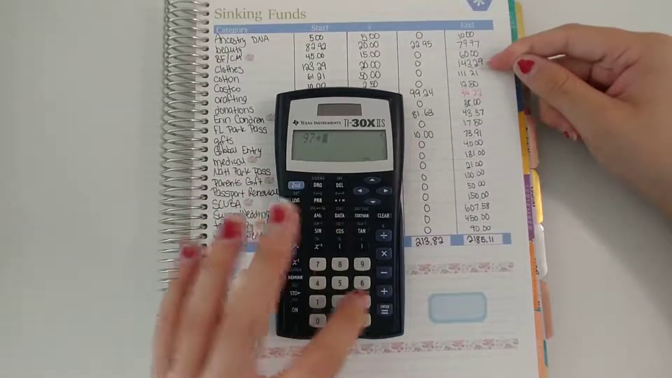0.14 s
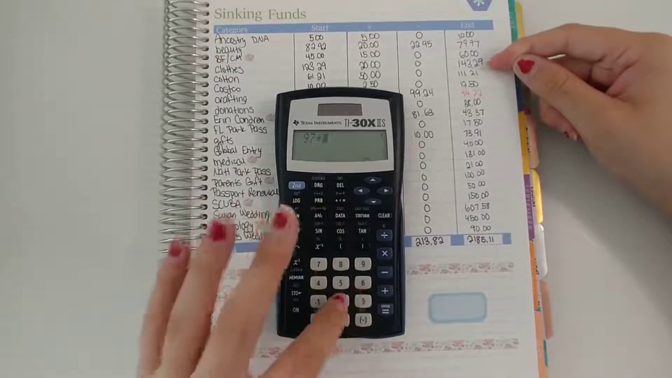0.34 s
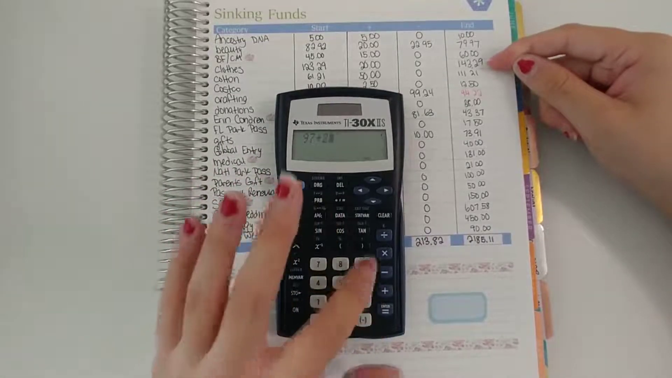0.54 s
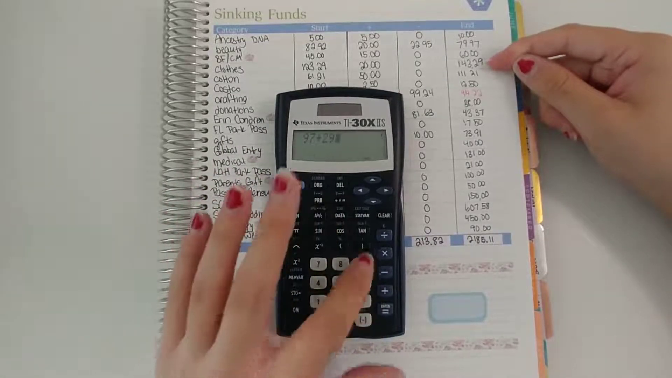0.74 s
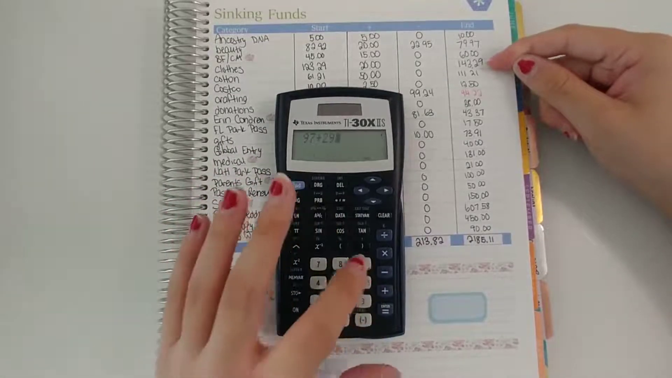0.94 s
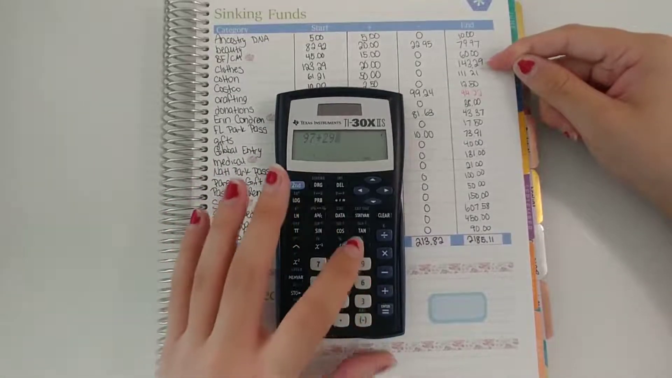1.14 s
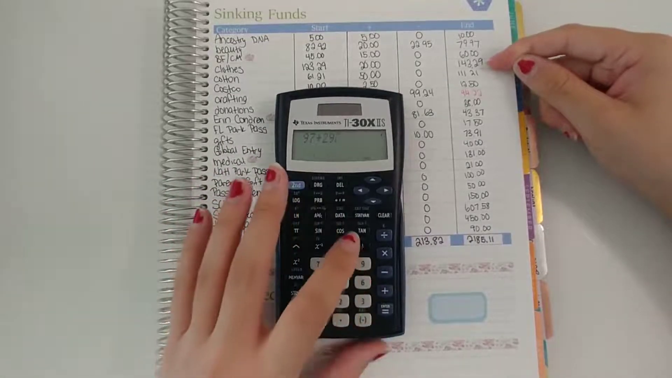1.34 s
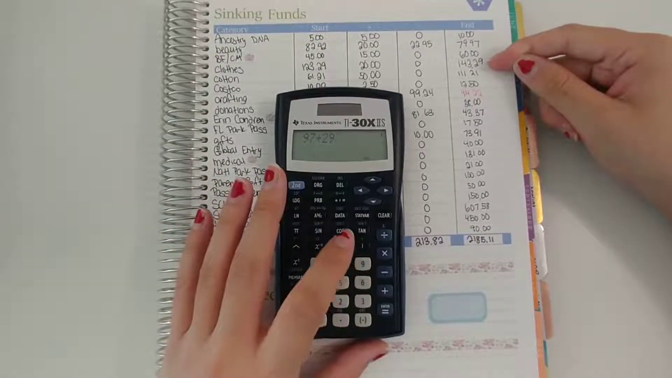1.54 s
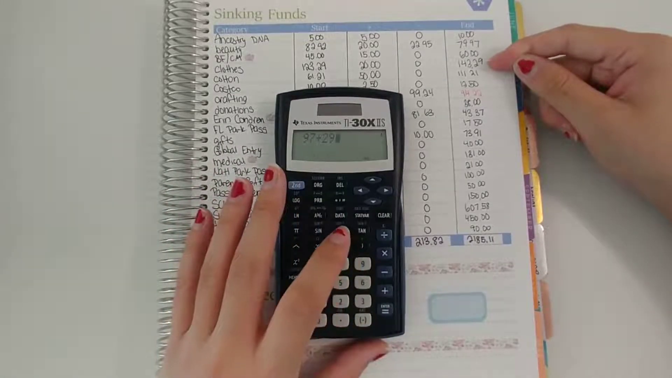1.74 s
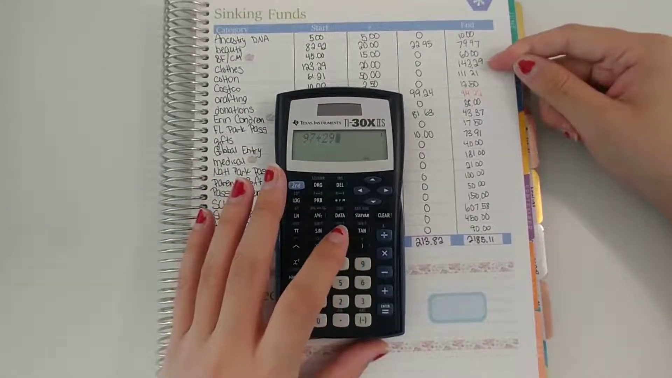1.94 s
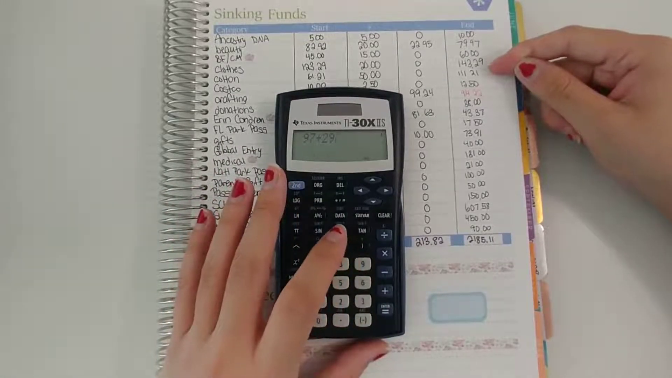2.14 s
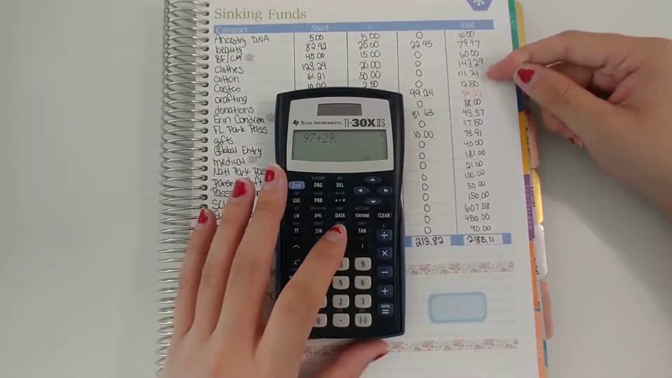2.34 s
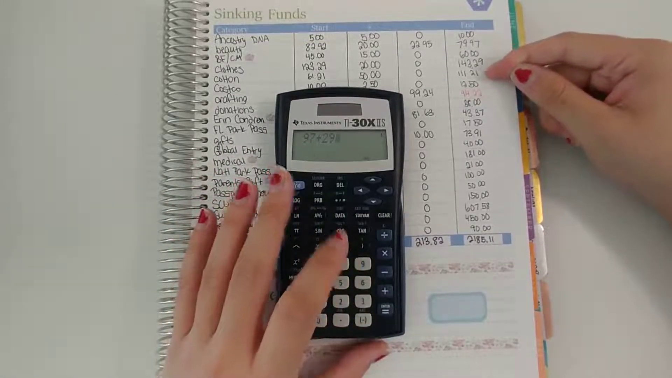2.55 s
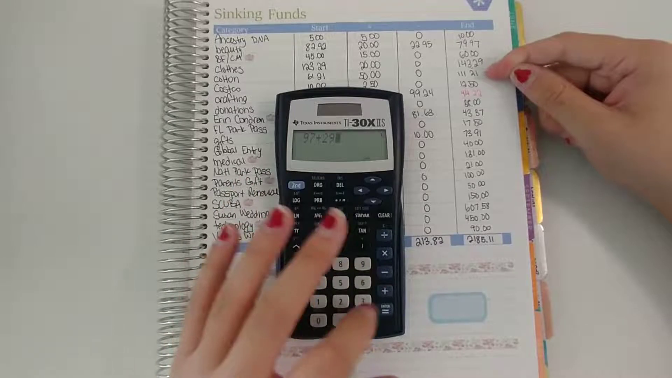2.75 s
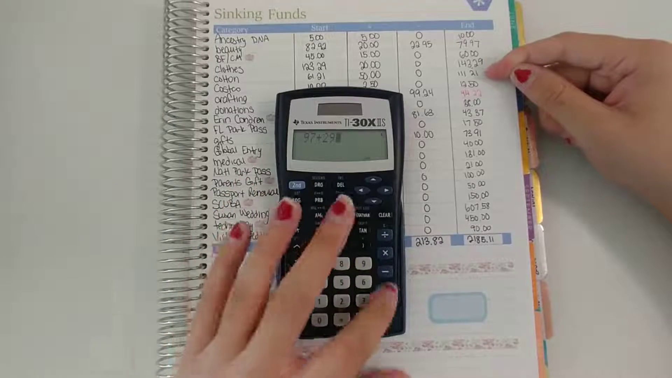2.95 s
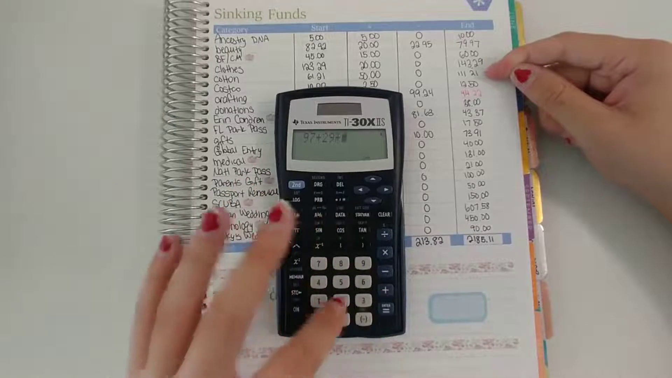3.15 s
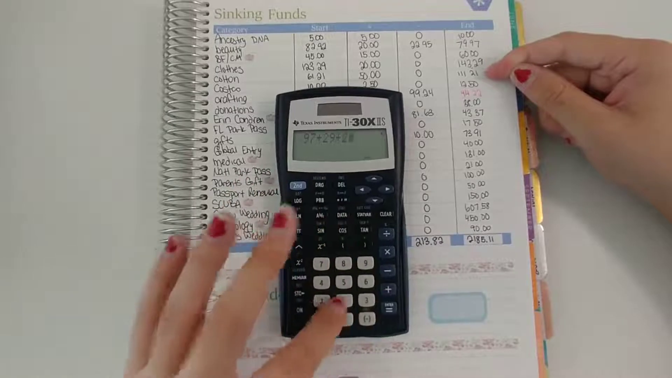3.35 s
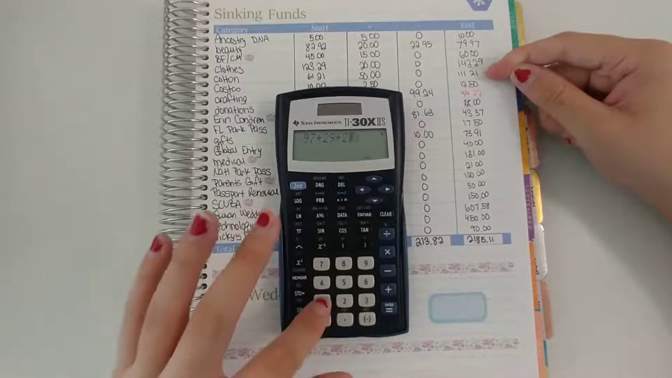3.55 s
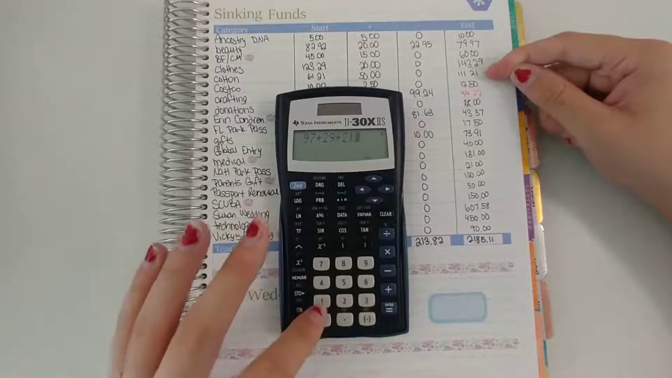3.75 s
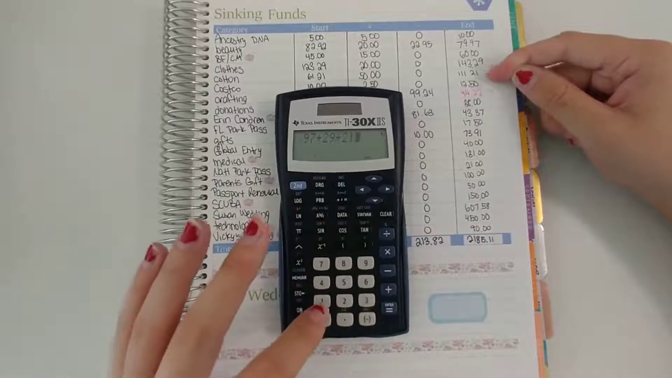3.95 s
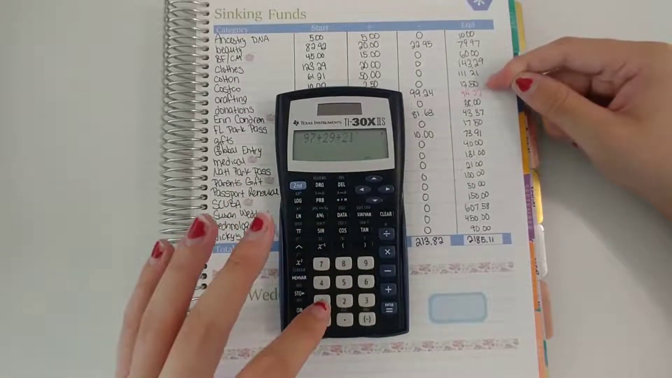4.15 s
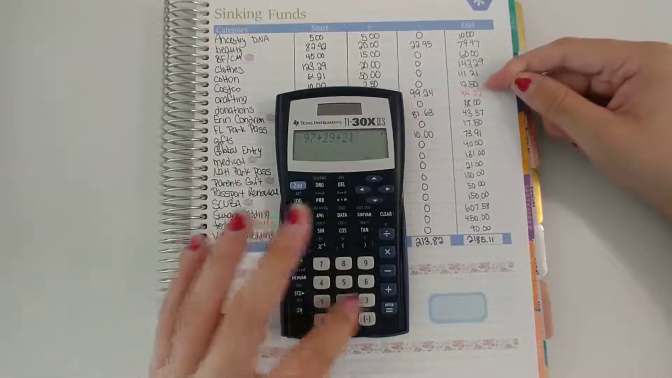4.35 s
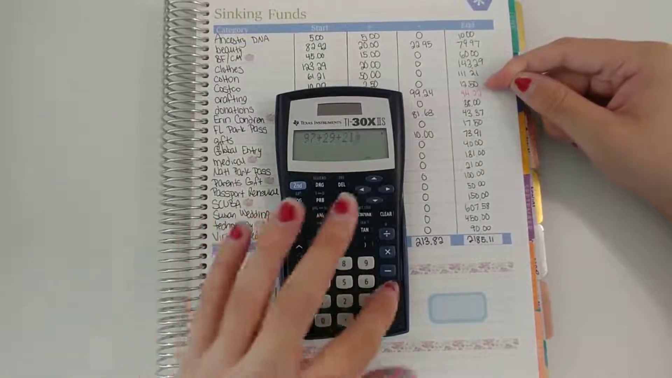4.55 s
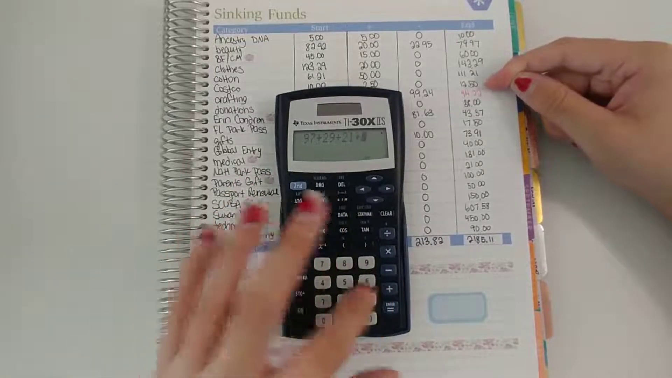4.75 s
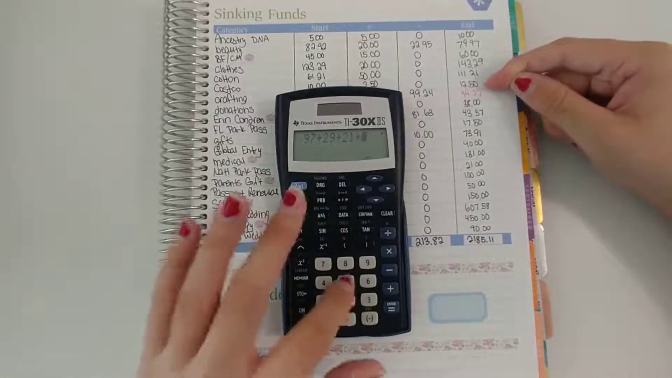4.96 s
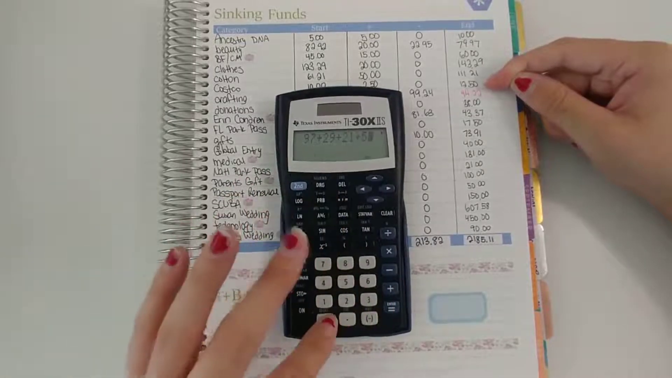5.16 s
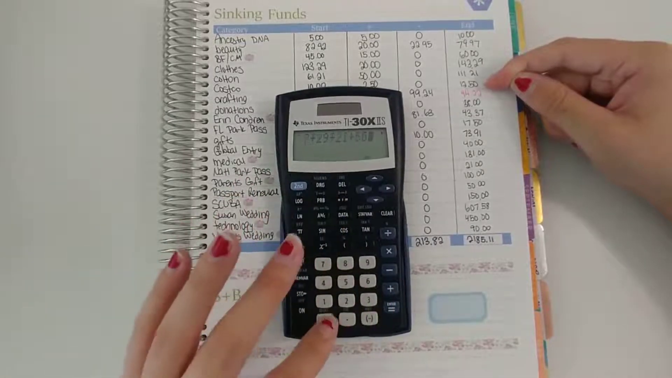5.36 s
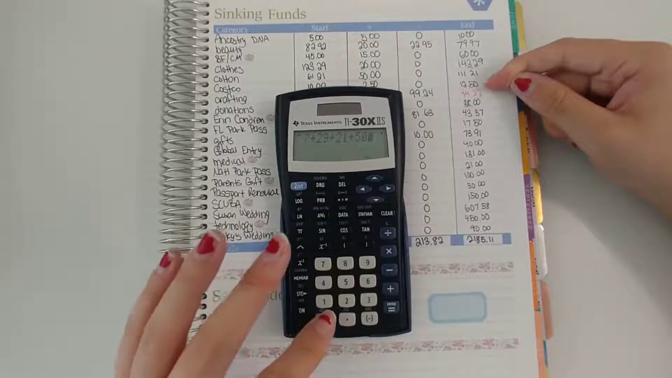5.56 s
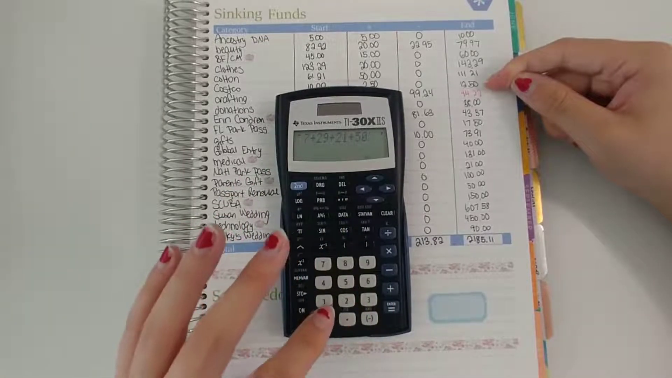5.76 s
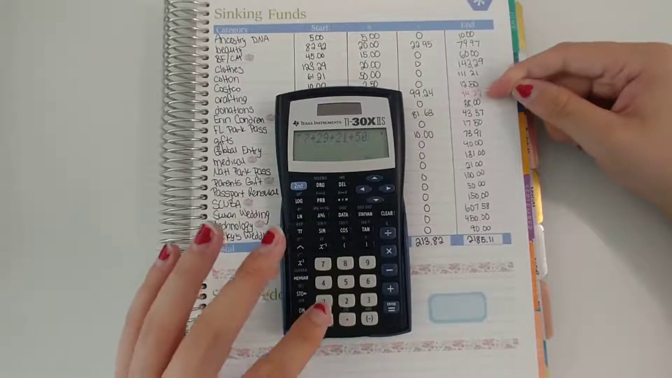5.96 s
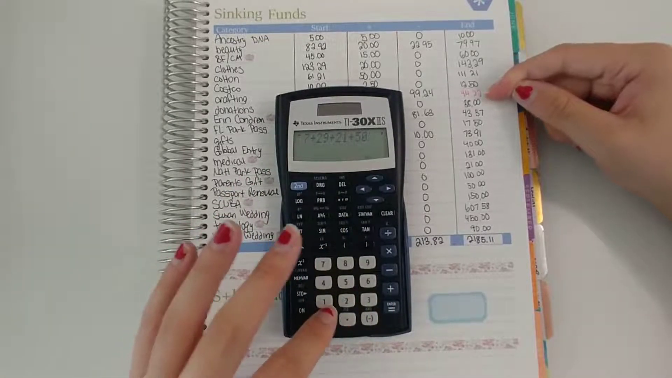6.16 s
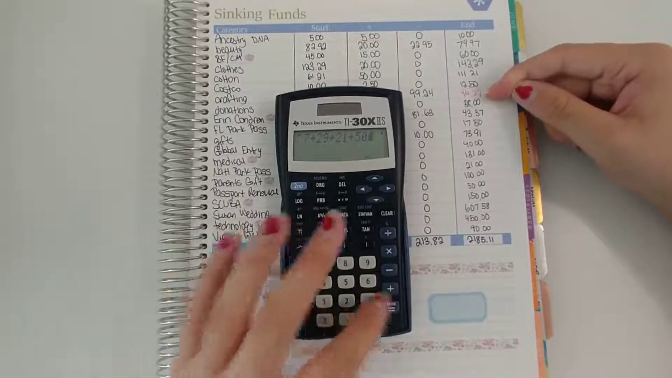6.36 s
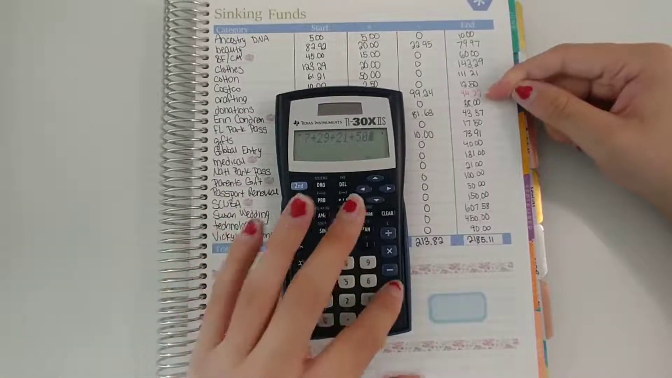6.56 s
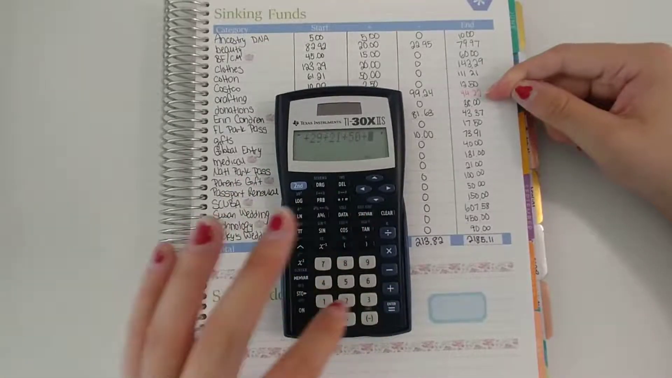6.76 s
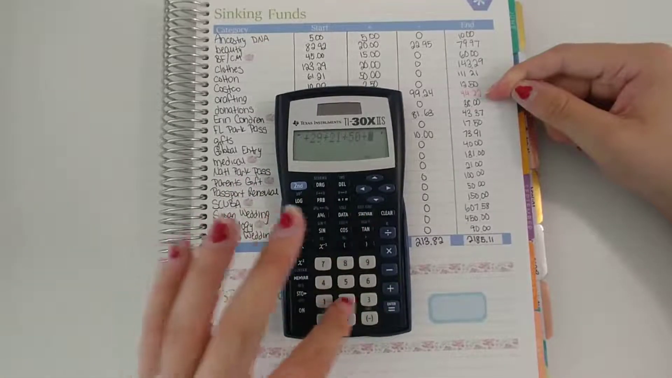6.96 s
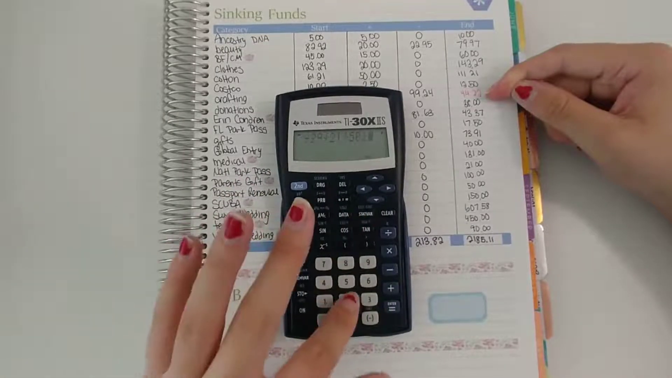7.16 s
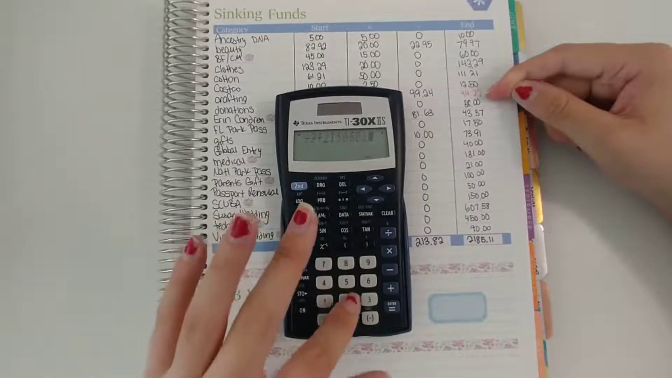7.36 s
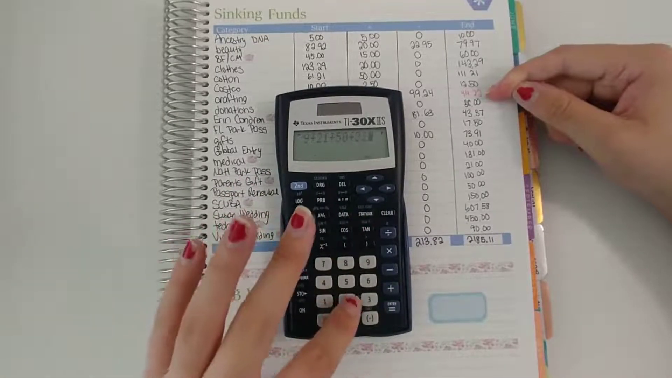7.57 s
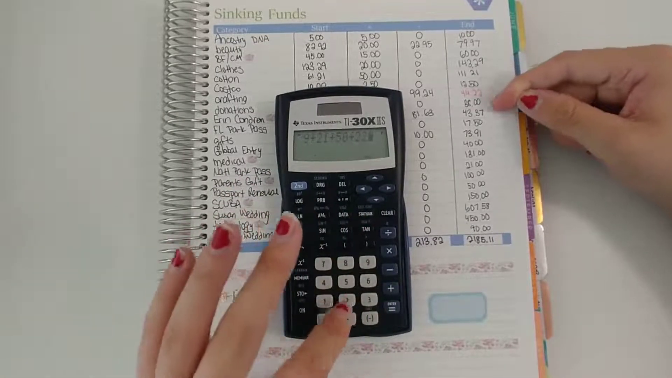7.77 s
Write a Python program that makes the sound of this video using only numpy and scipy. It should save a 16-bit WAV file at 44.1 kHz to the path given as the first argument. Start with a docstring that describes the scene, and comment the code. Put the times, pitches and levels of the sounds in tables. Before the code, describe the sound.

A thumb presses calculator keys on a desk, clicking and softly thumping, briefly interrupted by something hard knocking and clattering.

```python
"""Calculator keys on a desk

A thumb works the plastic keys of a calculator lying on a notebook: each key clicks down, thumps the
desk and snaps back. The hand brushes and pats the paper and case. Further off, something hard knocks
down, rings briefly and clatters. A small quiet room answers each blow, over a low rumble and hiss."""
import sys
import numpy as np
from scipy import signal
from scipy.fft import rfft, irfft, next_fast_len
from scipy.io import wavfile

SR = 44100
rng = np.random.default_rng(int(sys.argv[2]) if len(sys.argv) > 2 else 0)


def master(y):
    """Save y as 16-bit WAV."""
    cut = np.clip(np.atleast_2d(y).T, -1, 1)
    pcm = np.round(cut * 32767)  # scale
    wavfile.write(sys.argv[1], SR, pcm.astype(np.int16))


N = 345303


def amp(db):
    """Decibels to gain."""
    return 10 ** (np.asarray(db) / 20)


def unit(x):
    """Scale to rms 1."""
    return x / np.sqrt(np.mean(x ** 2) + 1e-20)


def unit_energy(x):
    """Scale each channel to energy 1."""
    return x / np.linalg.norm(x, axis=-1, keepdims=True)


def along(points, hz):
    """Interpolate (freq_hz, value) points on a log axis."""
    freq_hz, values = np.transpose(points)
    return np.interp(np.log(hz + 1), np.log(freq_hz), values)


def peak(hz, centre_hz, width_hz):
    """Resonance curve of height 1."""
    return 1 / (1 + (2 * (hz - centre_hz) / width_hz) ** 2)


def pan(left_db):
    """Stereo gains of mean power 1, left_db louder on the left."""
    return unit(amp(np.array([[left_db], [-left_db]]) / 2))


def add(track, start_s, sound):
    """Mix a sound into the track."""
    i = max(0, round(start_s * SR))
    track[:, i:i + sound.shape[-1]] += sound[..., :N - i]


def filtered(x, response):
    """Zero-phase filter with gain response(hz)."""
    size = next_fast_len(N + SR // 2)
    return irfft(rfft(x, size) * response(np.fft.rfftfreq(size, 1 / SR)), size)[..., :N]


# Background noise spectrum: freq_hz, density_db
AIR_SPECTRUM = [(20, -29.5), (42, -23), (58, -1), (170, -2), (280, -12.5), (450, -14), (800, -19),
                (1250, -25.5), (3000, -30), (5000, -33.5), (7500, -36.5), (10500, -42.5), (15500, -36.5)]
# Narrow bands in the hiss: centre_hz, width_hz, lift_db
HISS_BANDS = [(2225, 200, 7.5), (3620, 300, 10.5), (7450, 300, 5)]
# Left-right likeness of the noise: freq_hz, correlation (negatives act as 0)
AIR_CORRELATION = [(60, 0.98), (180, 0.82), (550, 0.36), (1650, -0.01), (4970, -0.26), (15000, 0.13)]
# Noise balance: freq_hz, left_over_right_db
AIR_BALANCE = [(60, 7), (240, 2.5), (950, 3.5), (3770, 3.5), (15000, 1)]
# Rumble swells, taken relative to their median: time_s, level_db
RUMBLE_SWELLS = [(0.0, -62.5), (1.44, -67), (2.22, -63), (2.97, -58), (3.09, -63.5), (4.27, -64),
                 (5.08, -61), (5.63, -64), (7.83, -59.5)]


def background(level_db):
    """Room rumble swells slowly under a steady hiss with a few narrow bands."""
    def mid_side_gains(hz):
        lift_db = sum(db * peak(hz, centre_hz, width_hz) for centre_hz, width_hz, db in HISS_BANDS)
        spread_rad = np.arccos(np.clip(along(AIR_CORRELATION, hz), 0, 1)) / 2
        return amp(along(AIR_SPECTRUM, hz) + lift_db) * np.array([np.cos(spread_rad), np.sin(spread_rad)])
    mid, side = filtered(rng.standard_normal((2, N)), mid_side_gains)
    balance = lambda hz: amp(np.outer([1, -1], along(AIR_BALANCE, hz)) / 2)
    air = unit(filtered(np.array([mid + side, mid - side]), balance))
    rumble = filtered(air, lambda hz: 1 / (1 + (hz / 400) ** 4))
    time_s, swell_db = np.transpose(RUMBLE_SWELLS)
    swell = amp(np.interp(np.arange(N) / SR, time_s, swell_db - np.median(swell_db)))
    return amp(level_db) * (air + rumble * (swell - 1))


def struck(force, colour_db, size=16384):
    """A short force drives a minimum-phase filter with response colour_db(hz)."""
    cepstrum = irfft(np.log(amp(colour_db(np.fft.rfftfreq(size, 1 / SR)))))
    cepstrum[1:size // 2] *= 2
    cepstrum[size // 2 + 1:] = 0
    return irfft(rfft(force, size) * np.exp(rfft(cepstrum)))


def contact(colour_db, crunch_s, rattle_db, t60_s, snap_gain, shared_gain, lag_s, size=2048):
    """One blow: a sharp snap, a crunch while the parts touch, a decaying rattle of dense modes."""
    t = np.arange(size) / SR
    noise = rng.standard_normal((3, size))
    decay = np.exp(-(t / crunch_s) ** 2) + amp(rattle_db - 60 * t / t60_s)
    attack = 1 - np.exp(-t / 0.00023)
    rattle = unit_energy((noise[:2] + shared_gain * noise[2]) * decay * attack)
    # the snap reaches the two microphone ports at slightly different times
    arrival_s = .0004 + lag_s * (2 * rng.random((2, 1)) - 1)
    force = rattle + snap_gain * np.sinc((t - arrival_s) * SR)
    return unit_energy(struck(force, colour_db)) * np.sqrt(.005 * SR)  # energy of 5 ms at rms 1


# Room decay: freq_hz, t60_s
ROOM_DECAY = [(200, 0.34), (600, 0.35), (2000, 0.46), (5000, 0.4), (8000, 0.31), (15000, .18)]


def room(dry, early_db, late_db, wall_s, spread_s):
    """Direct sound, scatter off the nearest surfaces and a diffuse tail, drawn anew for each blow."""
    hz, frame_s, spectra = signal.stft(rng.standard_normal((2, SR // 2)), SR, nperseg=256)
    decay = amp(-60 * frame_s / along(ROOM_DECAY, hz)[:, None])
    tail = signal.istft(spectra * decay, SR, nperseg=256)[1]
    t = np.arange(tail.shape[1]) / SR
    tail = unit_energy(tail * (1 - np.exp(-(t / wall_s) ** 2)))
    early = unit_energy(rng.standard_normal(tail.shape) ** 3 * np.exp(-((t - wall_s) / spread_s) ** 2))
    return signal.fftconvolve(dry, (t == 0) + amp(early_db) * early + amp(late_db) * tail, axes=1)


# Colour of the key clicks, shell and microphone together: freq_hz, gain_db
CLICK_COLOUR = [(150, -16), (480, -3.5), (1050, -7.5), (1500, 3.5), (1900, -2), (2750, -5), (3650, -2.5),
                (5000, -5.5), (6200, -6), (7900, -6.5), (9200, -19.5), (10700, -38.5), (13000, -19.5),
                (15300, -9), (16500, -27)]


def click(tone, bright_db, key_hz, fizz_db=0, resonance_db=9.5):
    """A key strikes its stop and rattles the shell; a brighter landing trades hollow body for edge."""
    tilt = [(1800, -.6 * bright_db), (3500, 0), (6000, 0.0049), (8000, bright_db), (13000, fizz_db)]

    def colour_db(hz):
        base_db = along(CLICK_COLOUR, hz) + along(tone, hz) + along(tilt, hz)
        return base_db + resonance_db * peak(hz, key_hz, .18 * key_hz)
    snap = contact(colour_db, crunch_s=0.0024, rattle_db=5.5, t60_s=0.029,
                   snap_gain=0.63, shared_gain=0.47, lag_s=.0001)
    return room(snap, early_db=-7, late_db=-19.5, wall_s=0.011, spread_s=0.013)


def chatter(start_s, level_db, key_hz, bounces, gap_s=.0073, bounce_db=-5.5, bounce_hz=3710):
    """Contacts of a loose key on the case: its click, then evenly spaced weaker bounces."""
    rebounds = [(start_s + gap_s * (k + 1), level_db + bounce_db, bounce_hz) for k in range(bounces)]
    return [(start_s, level_db, key_hz)] + rebounds


# Keys going down: start_s, level_db, bright_db, key_hz, bounces, nail_lead_s, travel_s, thump_db
KEY_PRESSES = [(0.3152, -40, 11, 6040, 0, 0.00071, .011, -47), (0.635, -41, 5, 5860, 2, 0.0047, 0.019, -42),
               (2.933, -26, -4, 1630, 1, 0.0031, 0.0118, -31),
               (3.2708, -46, 6.5, 5160, 0, .001, .025, -45.5),
               (3.4907, -51, -3, 1500, 1, .001, .041, -52.5),
               (4.5987, -46.5, 0.5, 4200, 0, .015, 0.0025, -35.5),
               (4.95, -47.5, 0, 3400, 0, 0.0061, 0.01, -37),
               (5.1987, -45, 2.5, 8200, 0, .0175, .061, -44.5),
               (6.532, -46, 1.5, 7140, 1, .004, 0.0038, -39.5),
               (7.093, -68, -0.5, 2600, 0, .02, .01, -43.5),
               (7.3297, -59, 3, 2600, 0, 0.0033, 0.037, -46.5)]
# Keys springing up: start_s, level_db, bright_db, key_hz, bounces, fizz_db
KEY_RELEASES = [(0.053, -57, -2, 2330, 0, 5), (0.4078, -39, -5, 8250, 0, -5),
                (0.7306, -32.5, -3.5, 5360, 1, 7), (3.0155, -36.5, -5, 7600, 1, -1),
                (3.3704, -39.5, -3.5, 6300, 0, -2), (3.6412, -41.5, -1, 6160, 0, -4),
                (4.6864, -40, 3.5, 5700, 1, -1.5), (5.0368, -46, -7.5, 4840, 0, -3),
                (5.3416, -34, 4.5, 5670, 0, -11), (6.615, -36, 3, 5660, 1, -3),
                (7.2047, -36, -2.5, 7660, 0, 4), (7.437, -48, -7, 3850, 0, -2)]
# Hollow downstroke: freq_hz, gain_db
PRESS_TONE = [(700, 0), (1800, 0), (3500, -1), (8000, -1), (13000, -8)]
# Thin upstroke: freq_hz, gain_db
RELEASE_TONE = [(700, -8.5), (1800, -3.5), (3500, -1), (8000, 7.5), (13000, -0.5)]


def keys(touch_db=-14):
    """The nail touches a key, the key clicks down, and on release it snaps back up."""
    out = np.zeros((2, N))
    for start_s, level_db, bright_db, key_hz, bounces, nail_lead_s, _, _ in KEY_PRESSES:
        nail_touch = (start_s - nail_lead_s, level_db + touch_db, key_hz)
        for at_s, db, hz in [nail_touch] + chatter(start_s, level_db, key_hz, bounces):
            add(out, at_s - .0003, amp(db) * click(PRESS_TONE, bright_db, hz))
    for start_s, level_db, bright_db, key_hz, bounces, fizz_db in KEY_RELEASES:
        for at_s, db, hz in chatter(start_s, level_db, key_hz, bounces):
            add(out, at_s - .0003, amp(db) * click(RELEASE_TONE, bright_db, hz, fizz_db))
    return out * pan(left_db=5.5)


# Desk top modes: freq_hz, relative_db, t60_s
DESK_MODES = [(68.7, -3, 0.22), (81.3, 11.5, 0.076), (108, -6, 0.18)]


def desk(knock_coupling_db=-29, pat_coupling_db=1):
    """Each key that bottoms out, each knock and each pat swings the desk top for a few cycles."""
    out = np.zeros((2, N))
    t = np.arange(SR // 2) / SR
    swing = sum(amp(db - 60 * t / t60_s) * np.sin(2 * np.pi * hz * t) for hz, db, t60_s in DESK_MODES)
    swing *= 1 - np.exp(-(t / 0.015) ** 2)
    swing /= np.abs(swing).max()
    pushes = [(start_s + travel_s, thump_db) for start_s, *_, travel_s, thump_db in KEY_PRESSES]
    pushes += [(start_s, db + knock_coupling_db) for start_s, db, *_ in HARD_KNOCKS]
    pushes += [(start_s, db + pat_coupling_db) for start_s, db in FINGER_PATS]
    for start_s, db in pushes:
        add(out, start_s - .004, amp(db) * swing)
    return out * pan(left_db=5)


# Hand strokes: centre_s, length_s, level_db
BRUSH_STROKES = [(1.1, .4, -84), (2.046, 0.07, -70), (4.038, 0.27, -71.5), (5.955, 0.25, -69.5),
                 (6.594, 0.17, -65), (7.38, 0.72, -72.5), (7.8, 0.072, -67.5)]


def brushes():
    """Skin slides over paper and case in faint grainy swishes."""
    t = np.arange(N) / SR
    envelope = sum(amp(db) * np.exp(-(2 * (t - centre_s) / length_s) ** 2)
                   for centre_s, length_s, db in BRUSH_STROKES)
    grains = unit(filtered(rng.standard_normal((2, N)) ** 3, lambda hz: amp(along(CLICK_COLOUR, hz))))
    return envelope * grains * pan(left_db=4.0)


# Pats on case and notebook: start_s, level_db
FINGER_PATS = [(1.27, -64.5), (1.415, -58), (3.49, -58), (3.516, -54), (5.2051, -46), (5.218, -57)]
# Colour of a soft blow on the notebook: freq_hz, gain_db
PAT_COLOUR = [(80, 1), (200, -4.5), (380, 2), (650, -8.5), (1000, -20), (1600, -22.5), (3000, -19),
              (8000, -30), (11000, -43)]


def pats():
    """Soft fingertips give dull thuds with no ring."""
    out = np.zeros((2, N))
    for start_s, level_db in FINGER_PATS:
        thud = contact(lambda hz: along(PAT_COLOUR, hz), crunch_s=0.0033, rattle_db=-17,
                       t60_s=0.043, snap_gain=0.97, shared_gain=4.4, lag_s=.00008)
        thud = room(thud, early_db=1.5, late_db=-5, wall_s=0.012, spread_s=0.0067)
        add(out, start_s, amp(level_db) * thud)
    return out * pan(left_db=1.5)


# Blows on the furniture: start_s, level_db, body_db, edge_db, knock_hz
HARD_KNOCKS = [(2.4002, -17, -7.5, -9.5, 1430), (2.4038, -19, -5, 0.5, 2100), (2.418, -22, 4.5, -2, 2240),
               (2.4224, -22.5, -0.5, -2, 1430), (2.7326, -20.5, 2.5, 11.5, 5600),
               (2.744, -27, -2, -4, 5650), (2.8027, -21, -5, -2.5, 2130), (2.9723, -29.5, 2, -3, 1900),
               (3.0411, -39.5, -2, 2.5, 3290), (3.0562, -37, 18, -19, 610), (3.094, -45, 13, -8, 900)]
# Colour of the hard knocks, object and microphone together: freq_hz, gain_db
KNOCK_COLOUR = [(100, -16), (260, -4.5), (330, -11.5), (430, 1.5), (750, -6.5), (1300, -5), (2350, -9),
                (2750, -11.5), (3100, -8), (4200, -15.5), (5400, -9), (6600, -15.5), (7900, -11),
                (9600, -25.5), (10700, -32.5), (12000, -27.5), (15500, -29)]
# The object's ringing modes: freq_hz, lift_db
OBJECT_MODES = [(285, 5), (458, 6.5), (545, -1), (624, 12.5), (790, 10), (956, 9.5), (1079, 4), (1135, 1.5),
                (1304, 4), (1373, 7), (1620, 6), (1785, 6), (1860, -8), (2032, 6), (2094, 13), (2212, 3),
                (2328, 9), (2384, 6.5), (2500, 3.5), (3042, 5.5)]


def knocks(resonance_db, mode_width_hz):
    """A hard object lands further off: a crack, a short ring of narrow modes, more room than the keys."""
    out = np.zeros((2, N))
    for start_s, level_db, body_db, edge_db, knock_hz in HARD_KNOCKS:
        # a glancing blow on an edge shifts the weight to the treble
        tone = [(400, body_db), (1000, 0.0011), (2400, 0.0056),
                (3500, edge_db), (8000, edge_db), (9800, .3 * edge_db)]

        def colour_db(hz):
            ring = sum(amp(db) ** 2 * peak(hz, mode_hz, mode_width_hz) for mode_hz, db in OBJECT_MODES)
            base_db = along(KNOCK_COLOUR, hz) + along(tone, hz) + 10 * np.log10(1 + ring)
            return base_db + resonance_db * peak(hz, knock_hz, .18 * knock_hz)
        crack = contact(colour_db, crunch_s=0.0035, rattle_db=-5, t60_s=.03,
                        snap_gain=.25, shared_gain=0.25, lag_s=.0001)
        crack = room(crack, early_db=-6, late_db=-10, wall_s=0.01, spread_s=.009)
        add(out, start_s, amp(level_db) * crack)
    return out * pan(left_db=4.5)


def scene():
    """Sounds at the desk, knocks further off and room noise."""
    near = keys() + pats() + desk() + brushes()
    return near + knocks(resonance_db=4, mode_width_hz=36) + background(level_db=-58.0)


def record(dry):
    """The camera cuts the deepest bass and everything above its band limit."""
    low_cut_hz, top_hz = 46, 15800
    thinned = signal.sosfilt(signal.butter(4, low_cut_hz, "high", fs=SR, output="sos"), dry)
    return filtered(thinned, lambda hz: 1 / np.sqrt(1 + (hz / top_hz) ** 160))


dry = scene()
out = record(dry)
master(out)
```